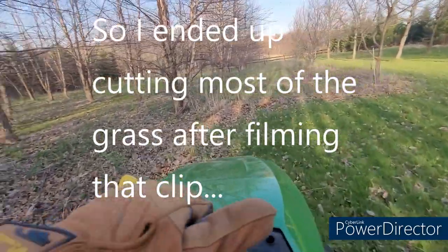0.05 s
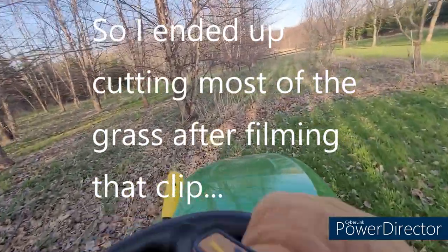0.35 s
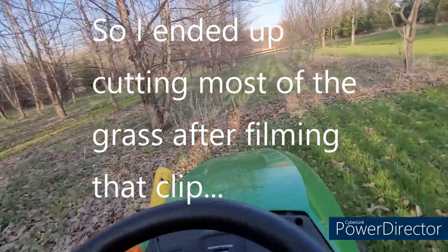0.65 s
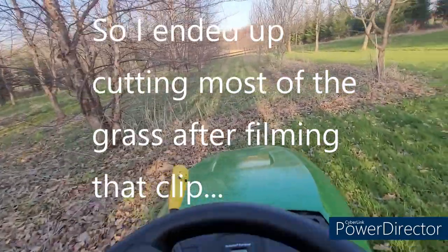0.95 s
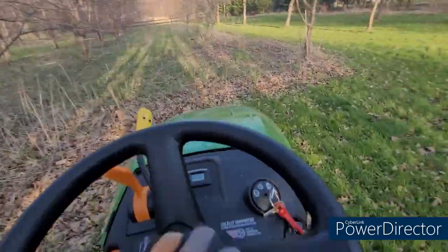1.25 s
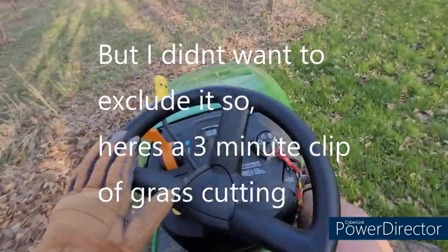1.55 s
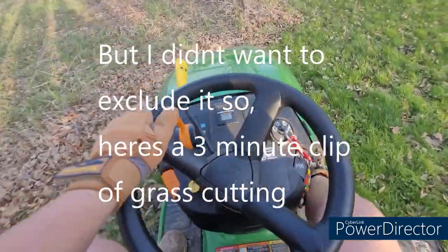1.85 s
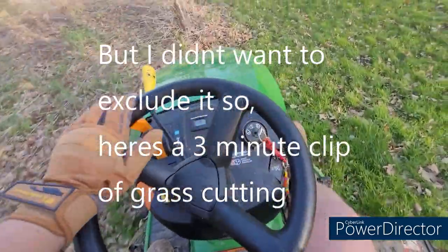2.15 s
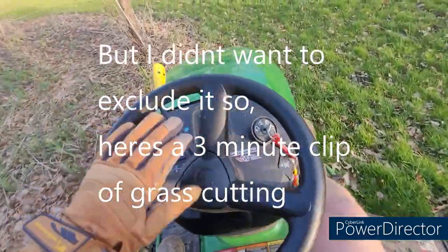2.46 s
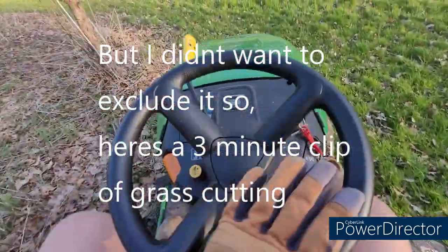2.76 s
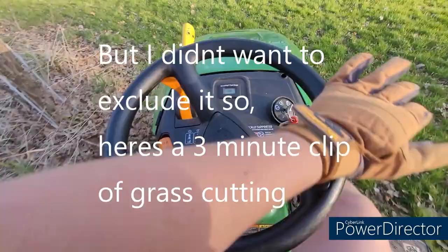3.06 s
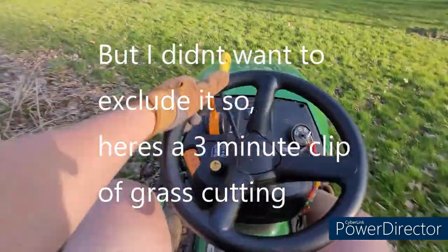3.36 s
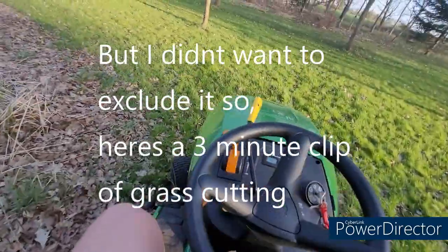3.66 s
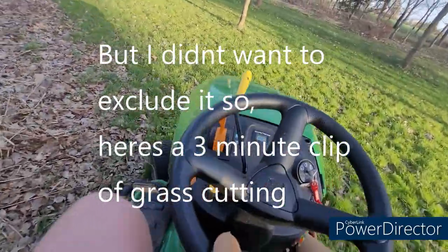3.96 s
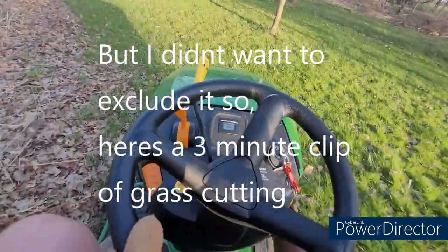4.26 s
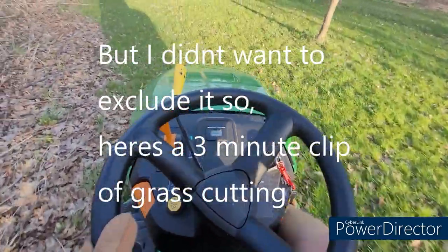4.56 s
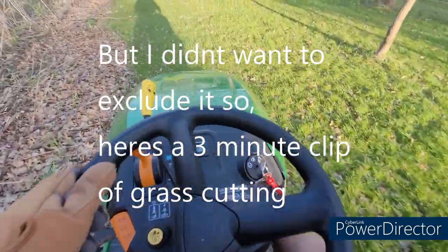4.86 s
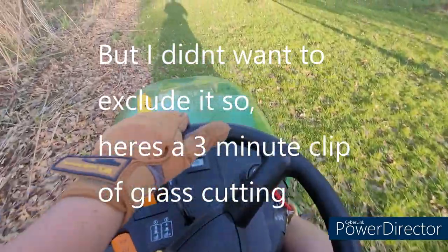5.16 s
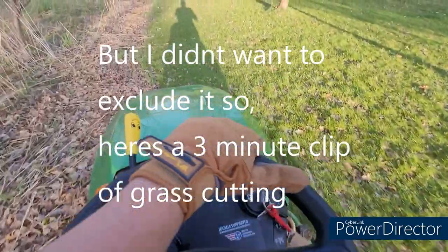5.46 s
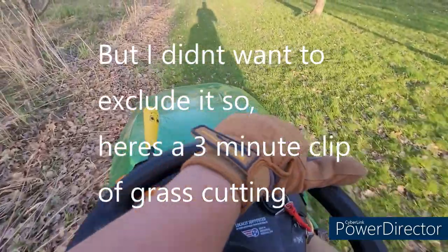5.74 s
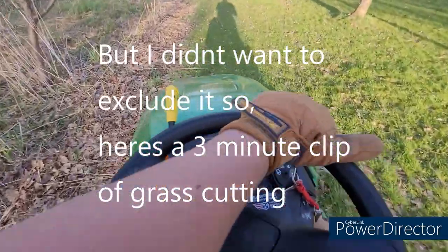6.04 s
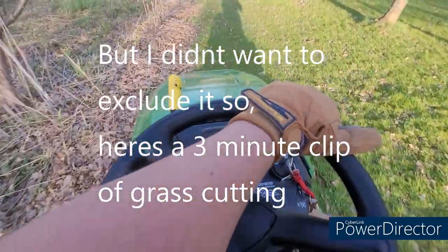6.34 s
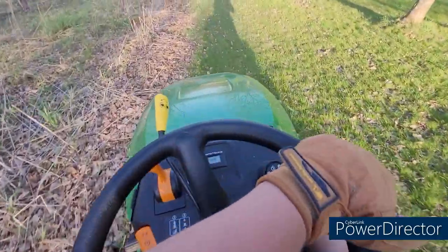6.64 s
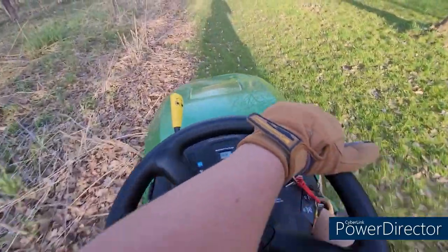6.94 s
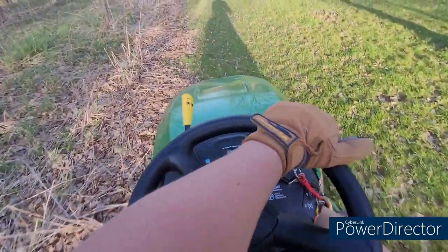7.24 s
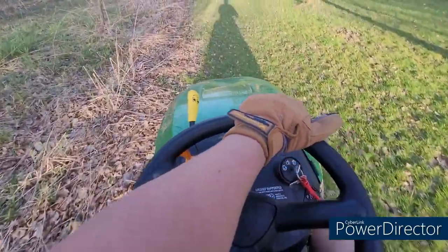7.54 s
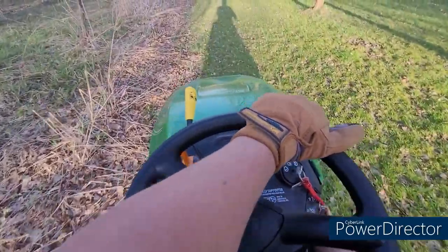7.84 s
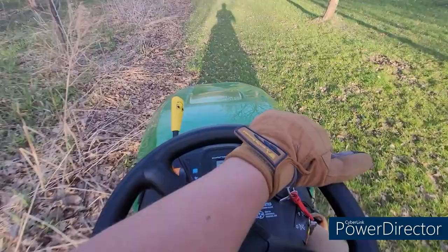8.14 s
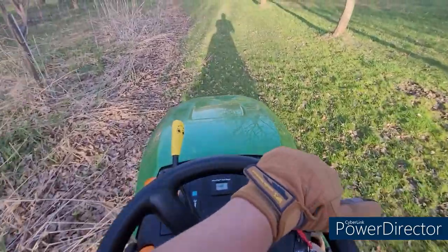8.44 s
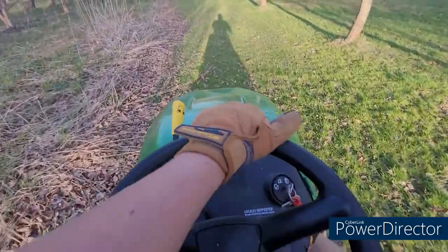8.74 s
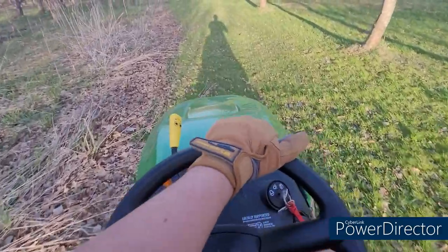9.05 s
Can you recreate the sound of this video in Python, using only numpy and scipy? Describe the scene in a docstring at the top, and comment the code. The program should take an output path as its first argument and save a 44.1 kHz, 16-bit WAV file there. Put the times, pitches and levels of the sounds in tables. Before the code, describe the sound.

Heard outdoors from the driver's seat, a riding mower's engine and blades make a continuous drone and roar, with a wavering belt hum and a rush of air. Shredded leaves and grass hiss mostly on the left, swelling in a few clumps. A short boom comes near the start, followed by a faint gear whine during a turn. The mowing carries on evenly, with scattered small cracks of twigs and grit.

```python
"""On a lawn, at the driver's seat of a riding mower that is cutting grass and dry leaves.
The exhaust pulses of a governed V-twin make a harmonic drone; a humming belt turns the blades, which
add blade-pass tones and a turbulent roar under the deck. Cooling air rushes through the hood, chopped
leaves hiss and crackle on the left, and twigs and grit strike now and then. The deck booms once over
a bump, and the drive's gears whine faintly in a turn."""
import sys
import numpy as np
from scipy import signal
from scipy.fft import rfft, irfft, next_fast_len
from scipy.io import wavfile
from scipy.ndimage import uniform_filter1d, minimum_filter1d, map_coordinates

SR = 44100
rng = np.random.default_rng(int(sys.argv[2]) if len(sys.argv) > 2 else 0)


def dump_mix(stems):
    """Bounce the given channels to the path in sys.argv[1] as a 16-bit WAV at rate SR."""
    frames = np.atleast_2d(stems).T  # one column per channel
    limited = np.clip(frames, -1, 1)  # hard clip at full scale
    pcm = np.round(limited * 32767).astype(np.int16)
    wavfile.write(sys.argv[1], SR, pcm)


N = 410130

# Levels in the tables are relative. An order is a multiple of the engine's four-stroke cycle rate.
# governed engine speed, sagging in the turn: t/s, cycle rate/Hz
CYCLE_RATE = [(0.0, 26.68), (0.9, 26.94), (1.9, 26.59), (2.35, 26.3), (4.25, 26.28), (5.0, 26.71),
              (5.8, 26.86), (6.6, 26.44), (7.6, 26.9), (9.3, 26.7)]
# drive whine, swelling with the steering and fading as the wheel comes back: t/s, level/dB
WHINE_LEVEL = [(0, -72), (1.8, -64), (2.3, -48.5), (2.7, -46.5), (2.78, -55.5), (4.4, -51), (5, -64),
               (9.3, -72)]
# gear-mesh tones: order, level/dB
GEAR_TONES = [(61.8, -3), (77, -6), (97, 0), (106, -7), (412, -11)]
# spectral density of the drive's rasp: f/Hz, level/dB
RASP_SPECTRUM = [(1200, -30), (1900, 4), (2350, 0), (2750, 1), (3300, -31)]
# hum of the belt drive: t/s, level/dB
BELT_LEVEL = [(0, -45), (1.4, -41), (1.8, -33), (2.4, -35.5), (4.2, -38), (4.6, -30.5), (5.1, -39.5),
              (9.3, -38)]
# ticks and rustles of flying grit and leaves: t/s, level/dB, T60/s
GRIT_HITS = [(0.6825, -15, .006), (1.122, -29.5, .15), (3.920, -30, .18), (6.080, -25, .05),
             (6.440, -29, .03), (6.9914, -23, .03), (7.1926, -25, .04), (7.2674, -25, .07)]
# spectral density of those ticks: f/Hz, level/dB
GRIT_SPECTRUM = [(1000, -20), (8000, -10), (12000, -2), (16000, -3)]
# twigs and tough stalks under the blades: t/s, level/dB, T60/s
TWIG_HITS = [(1.130, -32, .085), (2.526, -27, .03), (2.908, -28, 0.065), (3.090, -28, 0.064),
             (3.470, -33, 0.35), (4.983, -28, .04), (5.310, -25.5, .04), (6.159, -25, 0.046),
             (7.612, -22, 0.044), (7.785, -26, .05), (8.516, -24, 0.048), (9.070, -28, 0.13)]
# spectral density of a twig's crack: f/Hz, level/dB
TWIG_SPECTRUM = [(700, -27), (1500, 3), (2200, 10), (3000, 5), (3800, 6.5), (4700, -9), (5600, 0.5),
                 (9000, -18), (16000, -24)]
# cooling air at the seat, weaker while the driver looks down: t/s, level/dB
FAN_DB = [(0, -29.5), (.35, -32.5), (1.05, -31), (1.75, -36), (2.5, -34), (3.8, -34.5), (5.4, -33),
          (9.3, -32.5)]
# spectral density of the cooling air: f/Hz, level/dB
FAN_SPECTRUM = [(300, -31), (600, -5), (730, -3.5), (850, 0), (1060, 1), (1250, -5.5), (1500, -12.5),
                (2200, -16.5), (3200, -24.5), (8000, -42)]
# leaf spray, following how thick the leaves lie: t/s, level/dB
SPRAY_LEVEL = [(0, -37), (.4, -44.5), (.9, -41.5), (1.4, -45), (3.15, -45), (4.7, -40.5), (7.3, -39.5),
               (9.3, -42)]
# clumps of leaves drawn into the deck: t/s, half-width/s, extra spray/dB
LEAF_CLUMPS = [(.12, .11, 0), (1.12, .05, 3), (3.4, 0.15, 3.5), (3.923, 0.13, 3.5), (4.605, 0.13, 2.5)]
# spectral density of tearing stalks: f/Hz, level/dB
TEARING_SPECTRUM = [(700, -32), (1400, 2), (2100, 5), (2800, -1), (3900, -.5), (5000, -3.5), (6300, -6.5),
                    (7600, -6), (8600, -13.5), (11000, -9), (16000, -26)]
# spectral density of shreds hitting the deck: f/Hz, level/dB
SPRAY_SPECTRUM = [(3000, -30), (6000, -10.5), (7600, -1), (8700, -10), (9800, -5.5), (11000, 0),
                  (12500, -0.5), (15700, 2)]
# spectral density of the turbulence under the deck: f/Hz, level/dB
ROAR_SPECTRUM = [(18, -26), (66, -17), (90, -13), (103, -6), (146, -7.5), (199, 0.1), (252, 0.5),
                 (332, -4.5), (399, -6), (505, -10), (558, -13.5), (638, -19.5), (1000, -36), (2500, -73)]
# steadier belt-driven tones: multiple of the spindle rate, level/dB
SPINDLE_TONES = [(2, -29.3), (5, -28.5), (7, -39), (8, -38)]
# the two strong blade-pass harmonics: t/s, level of 2nd/dB, level of 3rd/dB
BLADE_LEVELS = [(0, -23.5, -23), (1.7, -20, -26.5), (2.45, -17, -28), (2.85, -21, -26), (4.1, -20.7, -20.3),
                (6.1, -19.3, -21.8), (7.6, -23.5, -19), (9.3, -24, -24)]
# harmonics of exhaust and block: order, level/dB
ENGINE_HARMONICS = [(2, -30), (3, -34), (4, -36), (5, -18.3), (6, -25.7), (7, -31), (8, -21), (9, -25.7),
                    (10, -37), (11, -34), (12, -35), (13, -39), (14, -39), (15, -38.5), (16, -39),
                    (17, -44), (19, -47)]
# likeness of the noise at left and right: f/Hz, correlation coefficient
CORRELATION = [(60, 0.29), (200, 0.94), (330, 0.77), (500, 0.83), (750, 0.32), (1100, -0.034),
               (2000, -0.077), (4000, -0.024), (12000, -0.18)]


def amp(db):
    """Amplitude ratio of a level in decibels."""
    return 10 ** (np.asarray(db) / 20)


def unit(x):
    """Normalisation to rms 1."""
    return x / np.sqrt(np.mean(x ** 2) + 1e-20)


def along(points, hz):
    """Interpolation of (f/Hz, value) points on a logarithmic frequency axis."""
    f, v = np.transpose(points)
    return np.interp(np.log(hz + 1), np.log(f + 1), v)


def curves(rows):
    """Linear interpolation in time: one value per sample for each column after the first."""
    times, *columns = np.transpose(rows)
    return [np.interp(np.arange(N) / SR, times, column) for column in columns]


def wobble(rate_hz):
    """Slow random modulation: a spline through Gaussian knots that come at rate_hz."""
    knots = rng.standard_normal(4096)
    coarse = np.arange(0, N + 64, 64)
    spline = map_coordinates(knots, [coarse * rate_hz / SR], mode="wrap")
    return np.interp(np.arange(N), coarse, spline)


def swell(at_s, half_s):
    """Gaussian envelope of height 1, down to 1/e at half_s to either side."""
    return np.exp(-((np.arange(N) / SR - at_s) / half_s) ** 2)


def noise():
    """Two uncorrelated white noises."""
    return rng.standard_normal((2, N))


def tone(turns):
    """Sinusoid of rms 1 with a random initial phase."""
    return np.sqrt(2) * np.sin(2 * np.pi * (turns + rng.random()))


def filtered(x, response):
    """Linear filtering: the spectrum of x is multiplied by a frequency response."""
    size = next_fast_len(N + 8192)
    return irfft(rfft(x, size) * response(np.fft.rfftfreq(size, 1 / SR)), size)[..., :N]


def pan(left_db):
    """Channel gains for an interaural level difference."""
    return amp([[left_db / 2], [-left_db / 2]])


def spread(pair, spectrum):
    """Partial coherence: coloured stereo of rms 1, nearly mono in the low mids and diffuse above."""
    def response(hz):
        angle = np.arccos(np.clip(along(CORRELATION, hz), -1, 1)) / 2
        return amp(along(spectrum, hz)) * [np.cos(angle), np.sin(angle)]
    mid, side = filtered(pair, response)
    return unit(np.array([mid + side, mid - side]))


def bodywork(pair, reach_s, echo_gain, count=10):
    """Comb filtering: weak early reflections from hood, fenders and driver ripple the spectrum."""
    delays = rng.integers(20, max(int(reach_s * SR), 40), (2, count))
    signs = rng.choice([-1, 1], (2, count))
    echoes = [sum(sign * np.roll(x, delay) for delay, sign in zip(side_delays, side_signs))
              for x, side_delays, side_signs in zip(pair, delays, signs)]
    return pair + echo_gain * np.array(echoes)


def flicker(pair, depth_db):
    """Spectral modulation: a random gain drifts over frequency and time."""
    spectrogram = signal.stft(pair, nperseg=256)[2]
    field = rng.standard_normal(spectrogram.shape[1:])
    field = uniform_filter1d(uniform_filter1d(field, 14, axis=0), 16, axis=1)
    return signal.istft(spectrogram * amp(depth_db * unit(field)), nperseg=256)[1][:, :N]


def gear_whine(cycle, jitter_turns=0.15, rasp_db=5):
    """Gear meshing: the drive's teeth give rough tones and a rasp, loudest while the mower turns."""
    whine_db, = curves(WHINE_LEVEL)
    mesh = sum(amp(db + 2.5 * wobble(20)) * tone(order * cycle + jitter_turns * wobble(45))
               for order, db in GEAR_TONES)
    rasp = amp(rasp_db) * spread(noise(), RASP_SPECTRUM)
    return amp(whine_db) * (mesh * pan(5.5) + rasp * pan(2))


def belt_hum(cycle, order=17.85, waver_db=3.0):
    """Forced vibration: the belt drive hums at a multiple of engine speed, wavering as it runs."""
    hum_db, = curves(BELT_LEVEL)
    return amp(hum_db + waver_db * wobble(6)) * tone(order * cycle + 0.16 * wobble(7))


def shell_boom(bump, mode_hz=372, level_db=-21):
    """Resonance: the deck's shell booms briefly as it rides over a bump."""
    return amp(level_db) * bump * tone(mode_hz * np.arange(N) / SR + 0.15 * wobble(29.8))


def impacts(hits, spectrum):
    """Damping: each hit is an exponentially decaying noise burst, coloured by the struck part."""
    t = np.arange(SR // 5) / SR
    envelope = np.zeros(N + SR)
    for at_s, db, t60 in hits:
        envelope[round(at_s * SR):][:len(t)] += amp(db - 60 * t / t60)
    return envelope[:N] * spread(noise(), spectrum)


def debris(grit_db=-6):
    """Impact noise: twigs crack against the steel deck; grit and dry leaves tick and rustle."""
    twigs = impacts(TWIG_HITS, TWIG_SPECTRUM) * pan(2.2)
    grit = amp(grit_db) * impacts(GRIT_HITS, GRIT_SPECTRUM) * pan(9)
    return twigs + grit


def cooling_fan(cycle, throb=0.14, waver_db=0.76):
    """Flow noise: cooling air rushes through the hood, pulsing three times per crankshaft turn."""
    fan_db, = curves(FAN_DB)
    pulse = 1 + throb * np.cos(2 * np.pi * 6 * cycle)
    air = spread(bodywork(noise() * pulse, reach_s=.03, echo_gain=0.095), FAN_SPECTRUM)
    return amp(fan_db + 3.5 + waver_db * wobble(20)) * air * pan(-0.15)


def crackle(rate_hz, scatter_db, decay_s):
    """Shot noise: tiny fractures of random size come at random, each an exponentially dying burst."""
    sizes = amp(scatter_db * np.minimum(rng.exponential(size=N), 4))
    onsets = rng.random(N) < rate_hz / SR
    energy = signal.lfilter([1], [1, -np.exp(-2 / (decay_s * SR))], onsets * sizes ** 2)
    return unit(noise() * np.sqrt(energy))


def cutting(clump_db, tearing_mean_db=-35, tearing_db_per_db=0.35):
    """Fracture and impact: stalks tear and shreds spray against the deck, louder in thicker leaves."""
    spray_db = curves(SPRAY_LEVEL)[0] + clump_db
    tearing_db = tearing_mean_db + tearing_db_per_db * (spray_db - spray_db.mean())
    stalks = unit(noise() + 0.7 * crackle(rate_hz=900, scatter_db=3.0, decay_s=0.0019))
    shreds = unit(noise() + .8 * crackle(rate_hz=2900, scatter_db=3.5, decay_s=.0004))
    stalks = flicker(bodywork(stalks, reach_s=.015, echo_gain=0.092), depth_db=0.98)
    shreds = flicker(shreds, depth_db=1.0)
    flow = wobble(40)  # leaves arrive unevenly
    tearing = amp(tearing_db + 0.27 * flow) * spread(stalks, TEARING_SPECTRUM) * pan(2.55)
    spray = amp(spray_db + 2.5 + 1.3 * flow) * spread(shreds, SPRAY_SPECTRUM) * pan(7.3)
    return tearing + spray


def deck_roar(cycle, clump_db, bump, steady_db=-17.5, bump_db=3, db_per_clump_db=.25, throb=0.046):
    """Turbulence: the air under the deck roars, swelling with clumps of leaves and at the bump."""
    puff = 1 + throb * np.cos(2 * np.pi * cycle)  # the exhaust, once a cycle
    roar_db = steady_db + db_per_clump_db * clump_db + bump_db * bump + 0.35 * wobble(8.1)
    return amp(roar_db) * spread(noise() * puff, ROAR_SPECTRUM) * pan(-1.3)


def blades(cycle, turns_per_cycle=1.738, slip_turns=0.017, flutter_db=0.9):
    """Rotational noise: two-ended blades chop the air; the belt creeps and the grass tugs at them."""
    spindle = turns_per_cycle * cycle + slip_turns * wobble(7)
    second_db, third_db = curves(BLADE_LEVELS)
    partials = SPINDLE_TONES + [(4, second_db), (6, third_db)]  # two blade passes a turn
    return pan(-.3) * sum(amp(db + flutter_db * wobble(12)) * tone(k * spindle) for k, db in partials)


def engine(cycle, jitter_cycles=0.0045, uneven_db=0.6, waver_db=.5, dispersion=0.00699):
    """Fourier series of a pulse train: two unevenly spaced exhaust pulses a cycle, none quite alike."""
    firing_gap = 450 / 720  # share of the cycle between the two cylinders
    jittered = cycle + jitter_cycles * wobble(22)
    drone = np.zeros(N)
    for order, db in ENGINE_HARMONICS:
        pair_phase = np.angle(1 + .9 * np.exp(-2j * np.pi * order * firing_gap))
        turns = order * jittered - dispersion * order ** 2  # the muffler smears each pulse a little
        harmonic = np.sqrt(2) * np.cos(2 * np.pi * turns + pair_phase)
        drone += amp(db + waver_db * wobble(4.3)) * harmonic
    return drone * amp(-0.26 + uneven_db * wobble(26)) * pan(-0.26)


def scene():
    """Superposition: all that turns follows the engine's speed; clumps of leaves load the deck."""
    cycle = np.cumsum(curves(CYCLE_RATE)[0]) / SR  # four-stroke cycles elapsed
    clump_db = sum(db * swell(at_s, half_s) for at_s, half_s, db in LEAF_CLUMPS)
    bump = swell(at_s=0.594, half_s=.1)
    tones = engine(cycle) + blades(cycle) + belt_hum(cycle) + gear_whine(cycle)
    air = deck_roar(cycle, clump_db, bump) + cooling_fan(cycle)
    return tones + air + cutting(clump_db) + debris() + shell_boom(bump)


def record(dry, ceiling=.97, top_hz=15800):
    """Peak and band limiting: a smooth gain holds down the highest peaks; nothing passes above top_hz."""
    needed = np.minimum(1, ceiling / (np.abs(dry).max(axis=0) + 1e-9))
    gain = uniform_filter1d(minimum_filter1d(needed, size=401), size=401)
    return filtered(dry * gain, lambda hz: hz < top_hz)


dry = scene()
out = record(dry)
dump_mix(out)
```